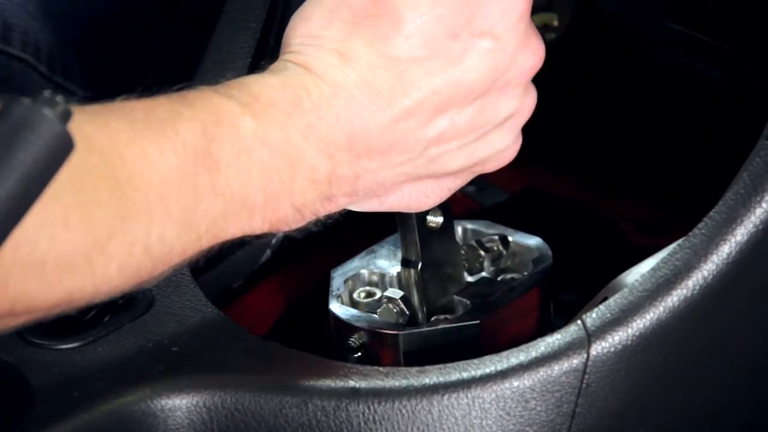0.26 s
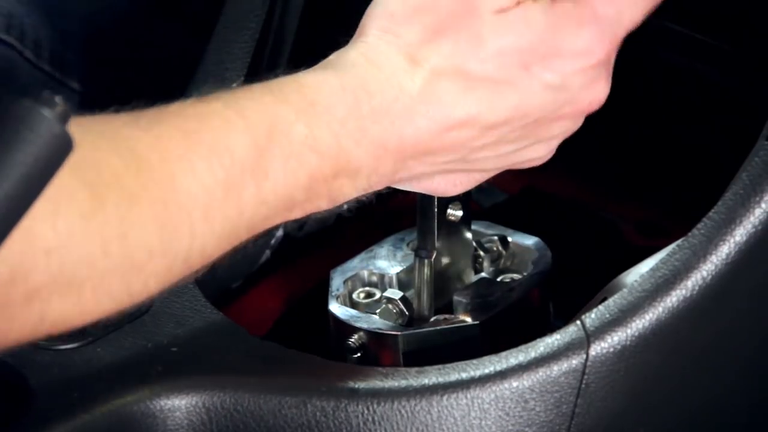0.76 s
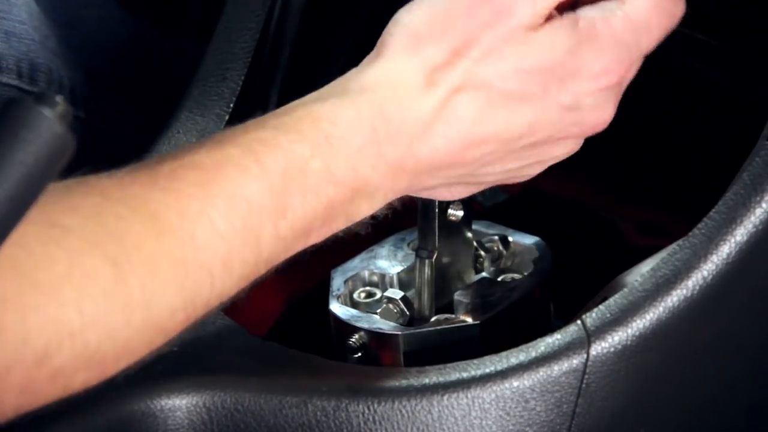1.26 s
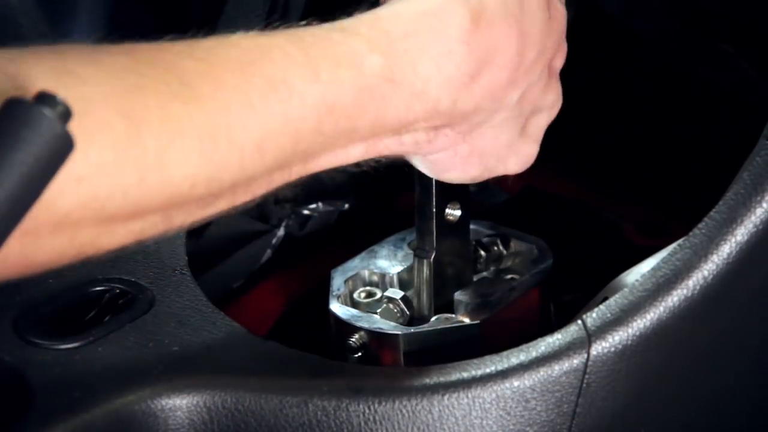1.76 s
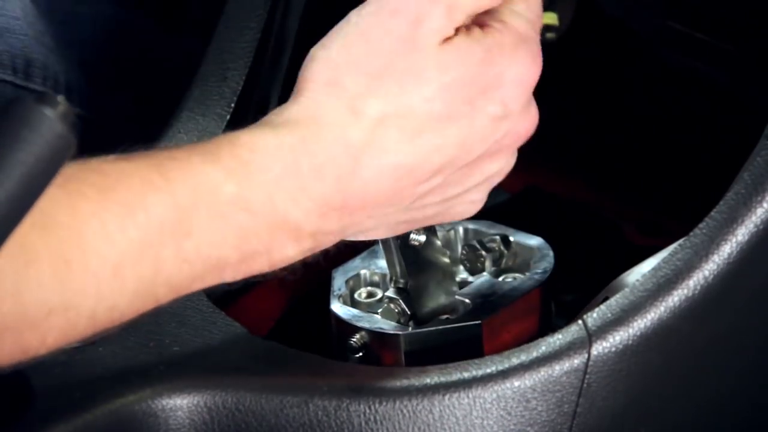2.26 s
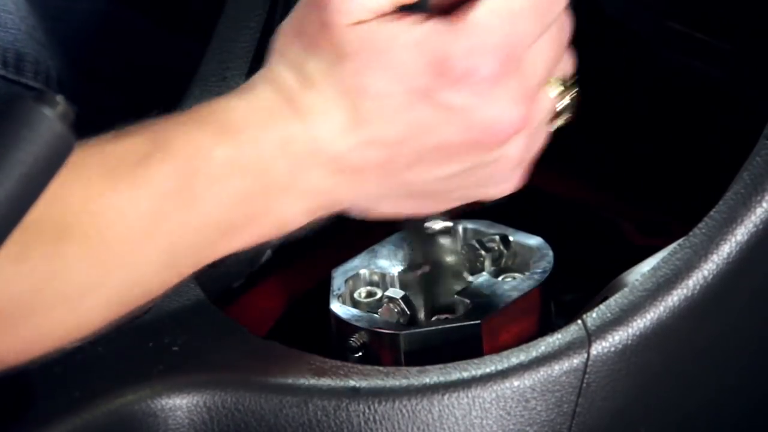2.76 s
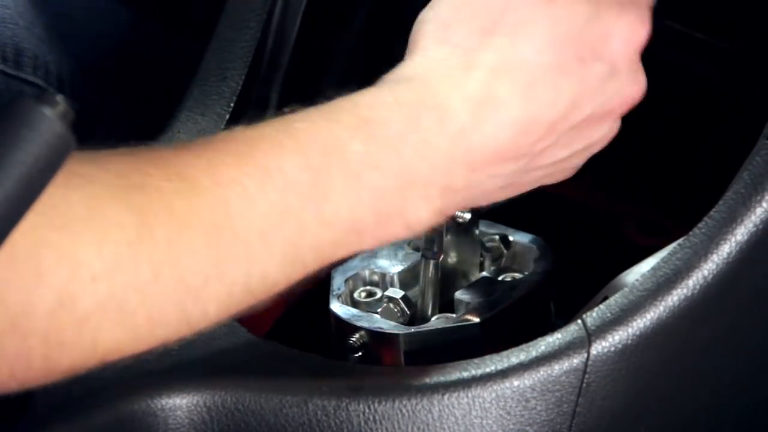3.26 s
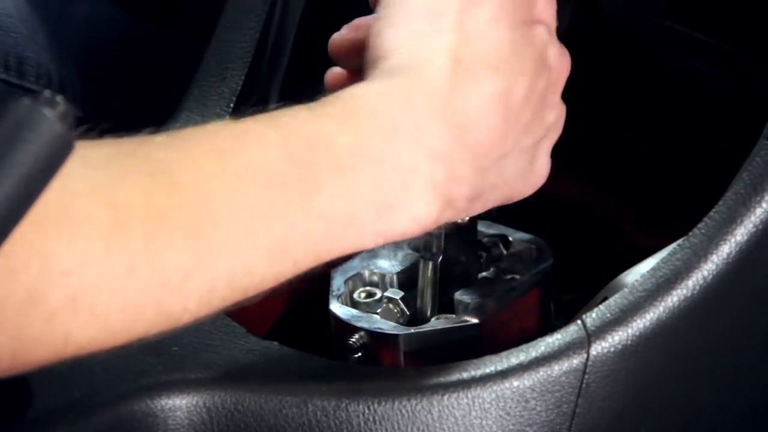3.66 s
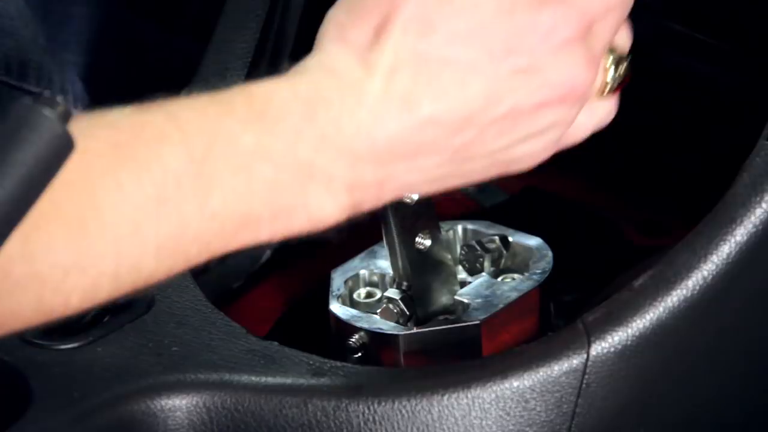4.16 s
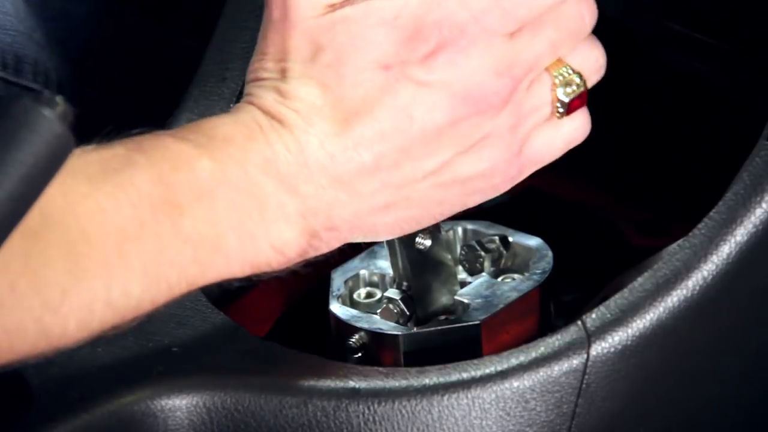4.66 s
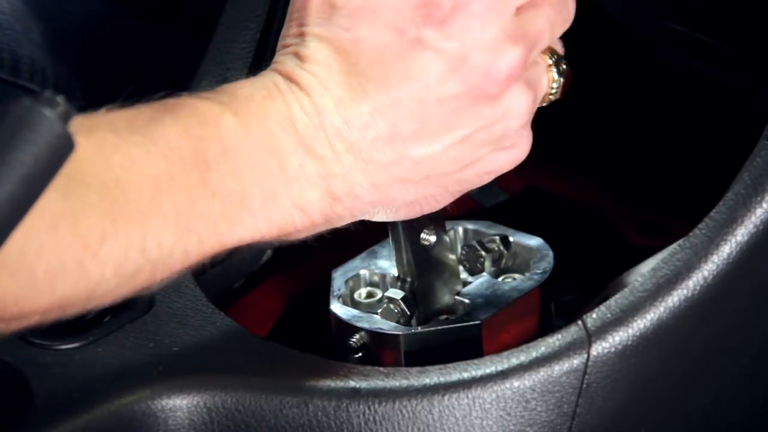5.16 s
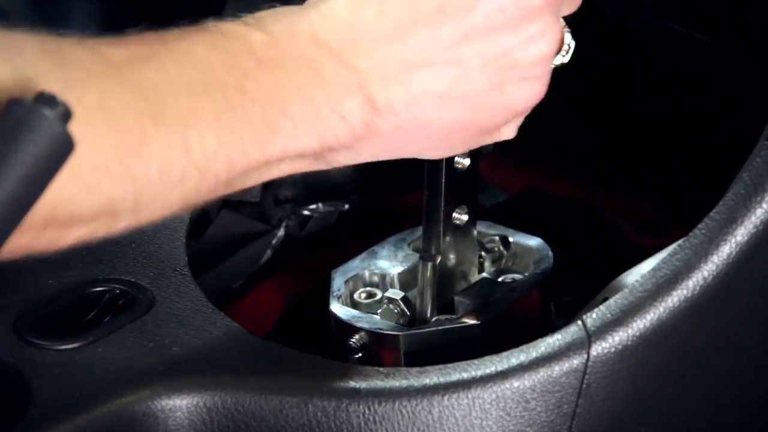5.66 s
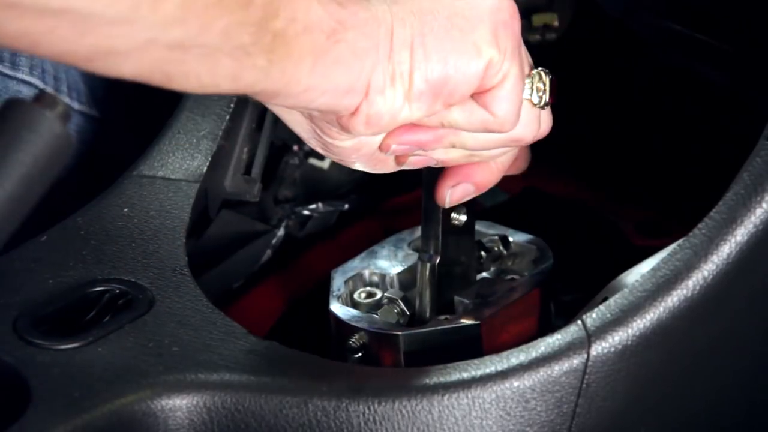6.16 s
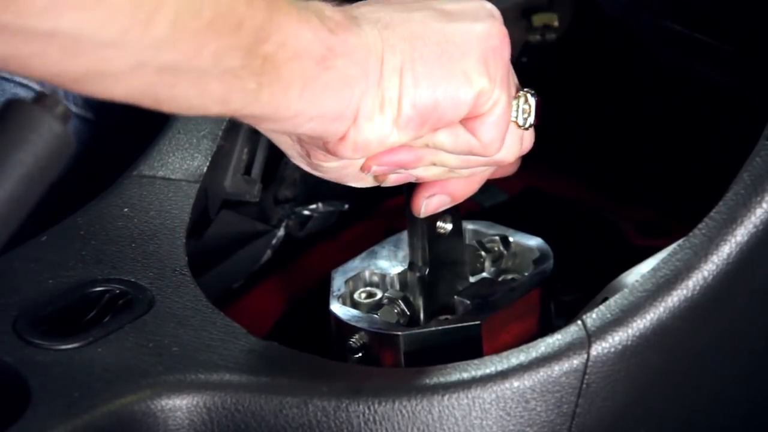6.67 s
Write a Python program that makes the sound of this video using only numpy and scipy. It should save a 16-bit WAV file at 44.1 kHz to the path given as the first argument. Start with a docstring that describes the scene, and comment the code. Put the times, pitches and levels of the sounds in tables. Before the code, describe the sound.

Hard metallic clunks of a hand-worked gear shifter, with small clicks, rubbing and short scrapes between them, over a low wavering cabin drone.

```python
"""In a parked car, a hand works a bare metal gear shifter through the gears, heard from close by.
Each shift: the linkage rubs and knocks (coloured noise grains), the detent scrapes and clicks (short noise
bursts), then the lever clunks on its stop (noise, decaying sines) and leaves a metallic ring (noise bands).
A wavering low sine drones over rumble and hiss and booms once as the hand shoves the console;
gain control ducks under the loudest blows."""
import sys
import numpy as np
from scipy import signal
from scipy.fft import rfft, irfft, next_fast_len
from scipy.io import wavfile
from scipy.ndimage import map_coordinates

SR = 44100
rng = np.random.default_rng(int(sys.argv[2]) if len(sys.argv) > 2 else 0)


def generate_wav(signal):
    """Clip the signal to [-1, 1] and save it as 16-bit WAV at the path in sys.argv[1]."""
    frames = np.transpose(np.atleast_2d(signal))
    scaled = np.clip(frames, -1, 1) * 32767
    pcm = np.round(scaled).astype(np.int16)
    wavfile.write(sys.argv[1], SR, pcm)


N = 304290

# the hand leans on the lever: start_s, length_s, rubbing_db, rattle_db (levels before each layer's own trims)
PUSHES = [(0.241, 0.2, -40, -48.5), (0.409, 0.16, -30.5, -40), (1.149, 0.173, -34, -42),
          (2.182, 0.17, -49, -43.5), (3.099, 0.23, -49, -55.5), (4.457, 0.24, -54, -48),
          (4.764, 0.14, -44.5, -45), (5.25, 0.22, -52, -47.5), (5.731, 0.12, -50, -45),
          (6.01, 0.24, -45, -43.5), (6.327, 0.49, -34.5, -39.5)]
# modes of the steel lever and linkage: pitch_hz (before detuning), level_db (relative), t60_s
STEEL_MODES = [(1188, 3, 0.3), (1380, -12, 1), (1573, -6, 0.62), (1715, 5, 0.099), (1848, 5, 0.17),
               (2170, 2.5, 0.23), (2474, 6, 0.27), (2830, -2, 0.23), (3196, 2, 0.26), (3960, 5, 0.09),
               (4400, -16, 0.42), (4520, -7, .4), (4890, -9, 0.35), (5830, -11, 0.31)]
# spectrum of the bright edge of metal contact and friction: frequency_hz, level_db (relative)
EDGE_SPECTRUM = [(3000, -20), (6000, 4), (8000, -1.5), (10500, 3), (13000, -0.5), (16000, -9)]


def amp(db):
    """Decibels to gain."""
    return 10 ** (np.asarray(db) / 20)


def unit(x):
    """Scale to rms 1."""
    return x / np.sqrt(np.mean(x ** 2) + 1e-20)


def along(points, hz):
    """Read a curve of (frequency, value) points on a log frequency axis."""
    f, v = np.transpose(points)
    return np.interp(np.log(hz + 1), np.log(f + 1), v)


def wobble(rate):
    """A smooth random curve with the given number of knots a second."""
    knots = rng.standard_normal(int(N * rate / SR) + 4)
    return map_coordinates(knots, [np.arange(N) * rate / SR])


def colour(x, spectrum):
    """Filter x through a spectrum and scale it to rms 1."""
    gain = amp(along(spectrum, np.fft.rfftfreq(len(x), 1 / SR)))
    return unit(irfft(rfft(x) * gain, len(x)))


def noise(spectrum, size=SR):
    """Steady coloured noise of rms 1."""
    return colour(rng.standard_normal(size), spectrum)


def fade(t60, attack):
    """A one-second envelope: a rise times an exponential decay, both in seconds."""
    t = np.arange(SR) / SR
    decay = np.exp(-np.log(1000) * t / t60)
    return decay * (1 - np.exp(-t / attack))


def burst(source, decay, attack, stretch=1, count=8):
    """Dense modes: overlapping bands of a noise each die at their own speed."""
    spectrum, centres = rfft(source), np.geomspace(100, 16000, count)
    hz = np.fft.rfftfreq(SR, 1 / SR)
    out = np.zeros(SR)
    for share, centre in zip(np.eye(count), centres):
        band = irfft(spectrum * np.interp(hz, centres, share), SR)
        out += band * fade(stretch * along(decay, centre), attack)
    return out


def ring(modes, attack, scatter_db, detune=0.0148):
    """Single modes; every blow meets them at new strengths, polarities and slightly shifted pitches."""
    t = np.arange(SR) / SR
    strengths = amp(scatter_db * rng.standard_normal(len(modes))) * rng.choice([-1, 1], len(modes))
    shifts = 1 + detune * rng.standard_normal(len(modes))
    out = np.zeros(SR)
    for strength, shift, (hz, db, t60) in zip(strengths, shifts, modes):
        tone = np.sin(2 * np.pi * hz * shift * t)
        out += strength * amp(db) * tone * fade(t60, attack)
    return out


def add(track, s, sound):
    """Mix a sound into a track at s seconds, cut off at the track's end."""
    room = track[max(0, round(s * SR)):][:len(sound)]
    room += sound[:len(room)]


def cabin():
    """A low sine drone, randomly swayed in pitch and level, over a steady rumble and hiss."""
    # levels of the low drone: time_s, level_db (before trim and waver);
    # the peak at 6.53 s is a low boom as the hand shoves the console
    drone_levels = [(0, -46), (2.0, -43), (2.6, -39), (4.0, -41), (4.65, -35.5), (4.9, -40.5), (5.1, -33),
                    (5.6, -39.5), (6.3, -37.5), (6.48, -30.5), (6.53, -23), (6.59, -33.5), (6.9, -29.5)]
    # spectrum of rumble and hiss: frequency_hz, level_db (relative)
    cabin_spectrum = [(20, -36), (45, 1.5), (80, 1.5), (115, -1), (150, -11.5), (250, -13), (500, -20),
                      (1000, -25.5), (2000, -32), (4000, -36.5), (8000, -39.5), (16000, -42)]
    drone_hz, wander_hz, waver_db = 69.5, 4.52, 2.5  # usual pitch; random sway of pitch and level
    level_db = np.interp(np.arange(N) / SR, *np.transpose(drone_levels))
    phase = 2 * np.pi * np.cumsum(drone_hz + wander_hz * wobble(16)) / SR
    drone = amp(level_db + 5.0 + waver_db * wobble(12)) * np.sin(phase)
    return drone + amp(-39.5) * noise(cabin_spectrum, size=N)


def regrips():
    """The palm slides round the knob for a new grip; skin brushes with a hiss that swells and fades."""
    # slides of the palm: middle_s, length_s, level_db
    palm_slides = [(0.56, 0.68, -54), (0.98, 0.39, -54.5), (5.3, 0.3, -56)]
    # spectrum of skin on the knob: frequency_hz, level_db (relative)
    skin_spectrum = [(300, -12), (1500, 4.5), (4000, 2.5), (8000, 0), (13000, 2.5), (16000, -5)]
    t = np.arange(N) / SR
    speed = np.zeros(N)
    for middle, length, db in palm_slides:
        speed += amp(db) * np.cos(np.pi * np.clip((t - middle) / length, -.5, .5))
    flutter = amp(0.73 * wobble(18))
    return speed * flutter * noise(skin_spectrum, size=N)


def rubbing(hiss_db=-23):
    """The pivot sticks and slips under load: dense uneven grains, and a fine hiss of friction."""
    # spectrum of the grains through the console: frequency_hz, level_db (relative)
    rubbing_spectrum = [(30, -22), (120, 6), (165, -9.5), (225, 5), (330, -0.5), (480, -10.5), (700, -11.5),
                        (1100, -21), (3000, -34.5), (6000, -40), (12000, -68)]
    push_attack_s, push_release_s = 0.022, 0.022
    grains_per_s = 2200  # on average
    t = np.arange(N) / SR
    load = np.zeros(N)
    for start, length, db, _ in PUSHES:
        rise = np.clip((t - start) / push_attack_s, 0, 1)
        release = np.exp(-np.maximum(t - start - length, 0) / push_release_s)
        load += amp(db) * rise * release
    slips = rng.standard_normal(N) * (rng.random(N) < grains_per_s / SR)
    hiss = amp(hiss_db) * noise(EDGE_SPECTRUM, size=N)
    return load * (colour(slips, rubbing_spectrum) + hiss)


def knock(db, tap_db):
    """Slack in the linkage is taken up with a tap and a dull bump, two decaying noises."""
    # spectrum of the dull bump: frequency_hz, level_db (relative)
    bump_spectrum = [(30, -19), (120, 0), (165, -7), (235, 6), (330, -3), (480, -3), (700, -10.5),
                     (1000, -22.5), (1600, -23), (3500, -40.5), (10000, -50)]
    # spectrum of the tap: frequency_hz, level_db (relative)
    tap_spectrum = [(150, -7), (400, 6), (650, 1.5), (950, -1), (1250, -1), (2000, -13.5), (3500, -17.5),
                    (7000, -51), (14000, -38)]
    bump = amp(db + 9) * noise(bump_spectrum) * fade(0.1, 0.0014)
    tap_envelope = fade(0.022, 0.00078) + amp(-21) * fade(0.16, .004)
    tap = amp(tap_db + 10) * noise(tap_spectrum) * tap_envelope
    return bump + tap


def rattle():
    """Every push shakes a loose run of small knocks out of the linkage."""
    knocks_per_s, scatter_db = 38, 3
    tap_db = -3  # tap level set against the bump's, before their trims
    out = np.zeros(N)
    for start, length, _, db in PUSHES:
        chance = zip(rng.random(size=24), rng.standard_normal(size=24))
        for k, (late, strength) in enumerate(chance):
            delay = (k + late) / knocks_per_s
            if delay < length:
                level = db + scatter_db * strength
                add(out, start + delay, knock(level, level + tap_db))
    return out


def knocks():
    """Single firm knocks as the linkage takes the load."""
    # the firmest knocks of slack: start_s, bump_db, tap_db (levels before the knock's trims)
    firm_knocks = [(0.419, -37, -42), (0.541, -33, -35), (0.584, -33, -34), (1.362, -24, -23.5),
                   (1.378, -28, -34), (1.952, -59, -41), (2.068, -37.5, -54), (2.182, -37, -41),
                   (2.216, -42, -43), (3.176, -54, -47), (3.327, -36.5, -42), (3.889, -53, -38.5),
                   (4.008, -63, -42.5), (4.529, -44.5, -42), (4.549, -34.5, -41.5), (4.66, -38, -44),
                   (4.808, -39.5, -41), (4.884, -32.5, -56), (5.745, -45, -43), (5.837, -45, -43),
                   (6.045, -38.5, -44), (6.287, -33, -46), (6.675, -30, -33)]
    out = np.zeros(N)
    for s, db, tap_db in firm_knocks:
        add(out, s, knock(db, tap_db))
    return out


def click(db, edge_db):
    """Loose metal parts tap each other and stop at once, damped by the hand."""
    # spectrum of the dry tick: frequency_hz, level_db (relative)
    tick_spectrum = [(200, -9), (900, -2.5), (1800, -1), (3500, 0), (5000, -6.5), (7000, -34), (12000, -19)]
    tick_envelope = amp(7.0) * fade(0.027, 0.00087) + amp(-8.5) * fade(.14, 0.0082)
    tick = noise(tick_spectrum) * tick_envelope
    # a second fade damps the steel's own decay
    steel = amp(-11.5) * ring(STEEL_MODES, attack=0.0011, scatter_db=4.0) * fade(0.095, .0005)
    edge_envelope = amp(11) * fade(0.02, 0.0023) + amp(-10) * fade(0.085, 0.0047)
    edge = noise(EDGE_SPECTRUM) * edge_envelope
    return amp(db) * (tick + steel) + amp(edge_db) * edge


def clicks():
    """Single clicks as the lever changes direction."""
    # dry clicks of play in the lever: start_s, tick_db, edge_db (levels before the click's trims)
    play_clicks = [(0.4822, -40, -45), (0.536, -40.5, -45), (0.59, -38, -42), (0.8361, -40, -44),
                   (1.2368, -30.5, -37), (1.2628, -38.5, -41), (1.342, -22, -25), (1.357, -21, -21),
                   (1.6, -42, -45.5), (5.4045, -49.5, -51), (6.0447, -47, -53), (6.1864, -39.5, -51),
                   (6.3253, -37, -45), (6.6759, -37, -40)]
    out = np.zeros(N)
    for s, db, edge_db in play_clicks:
        add(out, s, click(db, edge_db))
    return out


def judder(count=5):
    """Pressed hard, the lever catches and lets go along its gate in even slips that knock and click."""
    start_s, slip_every_s = 6.378, 0.0495
    bump_db, tap_db, tick_db, edge_db = -28.5, -37.5, -40, -48  # before the trims of knock and click
    out = np.zeros(N)
    for k in range(count):
        slip = knock(bump_db, tap_db) + click(tick_db, edge_db)
        add(out, start_s + k * slip_every_s, slip)
    return out


def scrapes():
    """The detent slides over its ramp: tiny slips of steel on steel merge into a short bright rasp."""
    # strokes over the ramp: start_s, level_db (before trim), length_s (where the cutoff halves the level)
    ramp_strokes = [(1.24, -31, 0.019), (1.328, -33.5, 0.028), (1.42, -29.5, 0.026), (2.34, -36, 0.04),
                    (3.343, -27, 0.051), (4.909, -30, 0.026), (4.933, -38.5, 0.039), (6.101, -30, 0.023),
                    (6.12, -40.5, 0.094), (6.734, -30, 0.041)]
    # spectrum of the rasp: frequency_hz, level_db (relative)
    scrape_spectrum = [(100, 13.5), (500, 14.5), (1300, 5), (2500, 3.5), (4500, -4), (7000, -11.5),
                       (8300, -7), (9600, 0.5), (13000, 1), (16000, -11)]
    out, t = np.zeros(N), np.arange(SR) / SR
    for s, db, length in ramp_strokes:
        # scattered strengths make the grain uneven
        slips = rng.standard_normal(SR) * amp(5.1 * rng.standard_normal(SR))
        stroke = fade(0.87, 0.0022) / (1 + (t / length) ** 4)
        add(out, s, amp(db + 3) * stroke * colour(slips, scrape_spectrum))
    return out


def shimmer(uneven_db=0.5, uneven_hz=120):
    """The long ring after a blow: noise bands, slightly uneven at random, with a chosen strongest region."""
    # long rings after blows: start_s, level_db, t60_s (before the decay shares),
    # centre_hz (of the lifted region), width_hz, lift_db
    long_rings = [(0.004, -24, 1.08, 1260, 130, 7.5), (1.455, -24.5, 1.03, 2550, 800, 4),
                  (2.348, -30, 0.74, 6470, 2500, 14), (2.379, -20.5, 1.09, 2800, 700, 0.5),
                  (3.375, -20.5, 1.02, 4400, 130, 9.5), (4.975, -37.5, 1.1, 1800, 694, 0.5),
                  (6.346, -36.5, 0.49, 2510, 900, 17), (6.76, -25.5, 0.81, 4330, 1200, -0.5)]
    # spectrum of the ring before unevenness and lift: frequency_hz, level_db (relative)
    ring_spectrum = [(100, 7.5), (400, 6), (620, 8), (950, -1), (1250, 1), (2500, -1.5), (3300, -4),
                     (4600, -10), (6000, -14.5), (7500, -23), (16000, -35)]
    # decay over frequency: frequency_hz, share of the ring's t60 (ratio)
    decay_shares = [(100, 0.84), (600, 0.66), (1200, 0.92), (2500, 1), (4500, 1), (7000, 0.99), (14000, 1)]
    out, hz = np.zeros(N), np.fft.rfftfreq(SR, 1 / SR)
    for s, db, t60, centre_hz, width_hz, lift_db in long_rings:
        random_levels = rng.standard_normal(size=1000)
        unevenness = uneven_db * map_coordinates(random_levels, [hz / uneven_hz], mode="wrap")
        lift = lift_db / (1 + ((hz - centre_hz) / width_hz) ** 2)
        source = unit(irfft(rfft(noise(ring_spectrum)) * amp(unevenness + lift), SR))
        add(out, s, amp(db) * burst(source, decay_shares, attack=0.0074, stretch=t60))
    return out


def clunks():
    """Steel hits the stop: a sharp crack, the lever's clank and the hollow knock of its mount."""
    # the lever meets a stop: start_s, clank_db, knock_db, edge_db (before the layers' trims), crack_hz
    stop_hits = [(0.0038, -6.5, -12, -30.5, 1680), (1.4391, -17.5, -20.5, -53, 3870),
                 (1.4551, -6.5, -9.5, -38, 3800), (2.347, -6, -15.5, -21.5, 4600),
                 (2.3783, -3, -7, -34, 1205), (3.3715, -13, -12, -55.5, 704),
                 (3.3748, -1, -9.5, -23.5, 3920), (4.962, -30, -21.5, -67, 1400),
                 (4.9747, -19, -18.5, -60, 1384), (6.346, -21.5, -24, -49, 2470),
                 (6.7402, -14, -20, -29.5, 4100), (6.7597, -10, -14, -27, 3900)]
    # modes of the shifter and its mount: pitch_hz (before detuning), level_db (relative), t60_s
    mount_modes = [(252, -13, 0.34), (385, -1, 0.11), (598, -2, 0.29), (626, -26, 0.79), (826, 0.5, 0.071),
                   (922, -15, 0.3), (1200, -19.5, 0.61), (1396, -5, 0.073)]
    # spectrum of crack and clank: frequency_hz, level_db (relative)
    clank_spectrum = [(100, -13), (500, -57), (1000, -34), (1400, -7), (2500, 7.5), (4000, 3.5),
                      (5200, 2.5), (6500, -7.5), (8000, -11.5), (16000, -57)]
    # spectrum of the hollow knock: frequency_hz, level_db (relative)
    thud_spectrum = [(25, 0.5), (80, -5.5), (170, -4), (380, -8.5), (540, 2.5), (680, -1.5), (850, -2),
                     (980, -5.5), (1300, -3), (2000, -8.5), (6000, -79)]
    # decay of clank and knock: frequency_hz, t60_s
    metal_decay = [(100, 0.25), (600, 0.22), (1500, 0.16), (4000, 0.097), (8000, 0.11), (16000, .05)]
    out, t = np.zeros(N), np.arange(SR) / SR
    for s, clank_db, knock_db, edge_db, crack_hz in stop_hits:
        crack = amp(-7.5) * noise(clank_spectrum) * fade(0.0073, 0.0002)
        crack += amp(1.5) * np.sin(2 * np.pi * crack_hz * t) * fade(0.0045, 0.000063)
        clank = amp(-9.0) * burst(noise(clank_spectrum), metal_decay, attack=0.0015)
        clank += amp(-27) * ring(STEEL_MODES, attack=0.00067, scatter_db=1.5)
        hollow = amp(-1.0) * burst(noise(thud_spectrum), metal_decay, attack=0.0041)
        hollow += amp(-4.5) * ring(mount_modes, attack=0.0028, scatter_db=-1.5)
        edge_envelope = amp(2) * fade(0.0074, 0.00041) + amp(2) * fade(0.054, 0.00055)
        edge_envelope += amp(-11) * fade(0.33, 0.0022)
        edge = noise(EDGE_SPECTRUM) * edge_envelope
        add(out, s, amp(clank_db) * (crack + clank) + amp(knock_db) * hollow + amp(edge_db) * edge)
    return out


def scene():
    """Everything sums at one microphone beside the console."""
    handling = regrips() + rubbing() + rattle() + knocks() + judder()
    shifts = clicks() + scrapes() + shimmer() + clunks()
    return (cabin() + handling + shifts)[None]


def record(dry, threshold_db=-19, recovery_db=7.0):
    """Gain control, deaf to bass, ducks loud blows and recovers by a few dB a second; then a band limit."""
    smoothing_s, top_hz = 0.006, 16000
    heard = signal.sosfilt(signal.butter(2, 250, "high", fs=SR, output="sos"), dry[0])
    # the smoothed level lags, so the first crack gets through
    step = 1 / (smoothing_s * SR)
    level_db = 10 * np.log10(signal.lfilter([step], [1, step - 1], heard ** 2) + 1e-12)
    # a running maximum on a rising ramp holds each peak and lets it sink at recovery_db per second
    ramp = recovery_db * np.arange(N) / SR
    excess_db = np.maximum(level_db - threshold_db, 0)
    duck_db = np.maximum.accumulate(excess_db + ramp) - ramp
    m = next_fast_len(N + SR // 2)
    passed = np.fft.rfftfreq(m, 1 / SR) < top_hz
    return irfft(rfft(dry * amp(-duck_db), m) * passed, m)[:, :N]


dry = scene()
out = record(dry)
generate_wav(out)
```